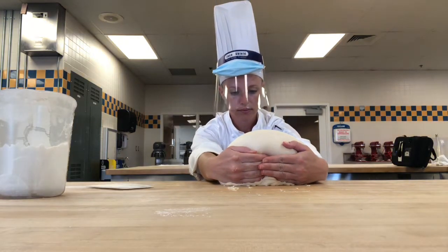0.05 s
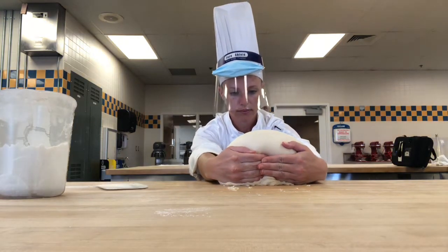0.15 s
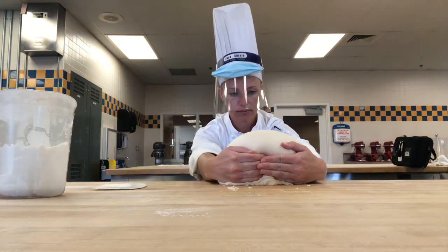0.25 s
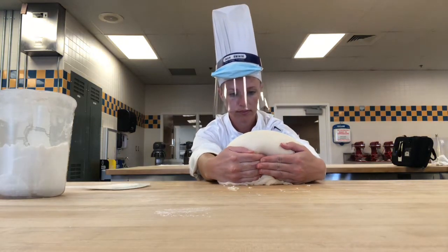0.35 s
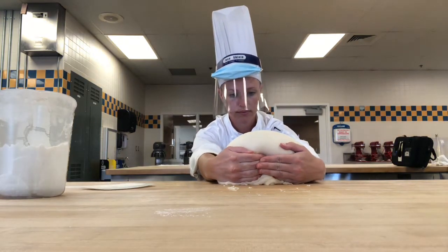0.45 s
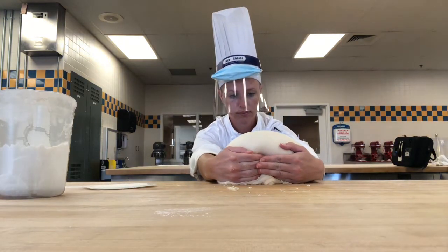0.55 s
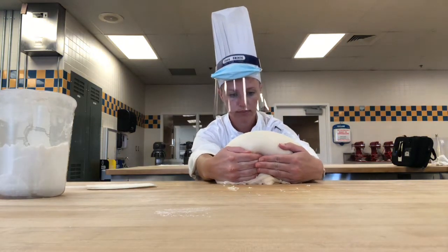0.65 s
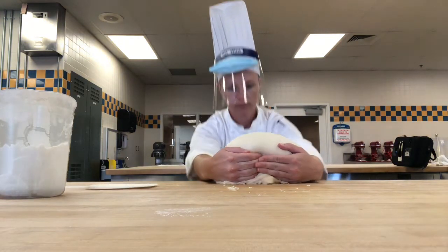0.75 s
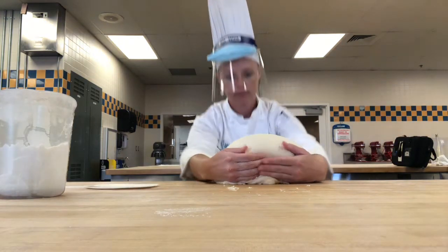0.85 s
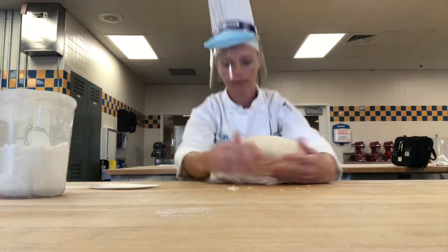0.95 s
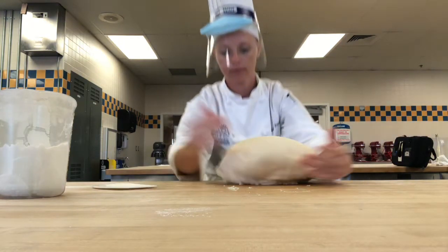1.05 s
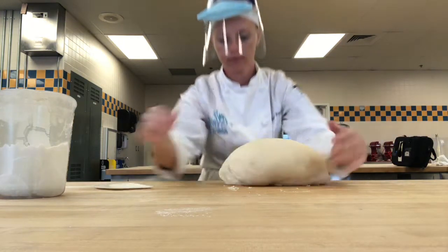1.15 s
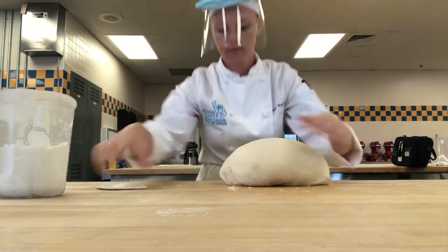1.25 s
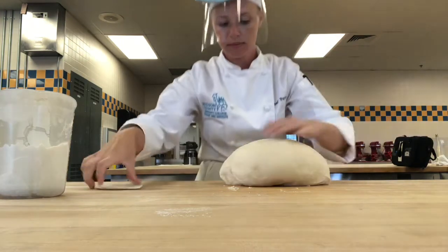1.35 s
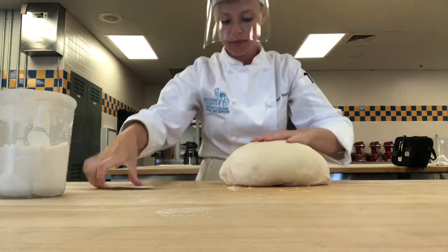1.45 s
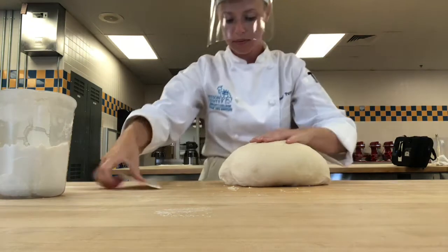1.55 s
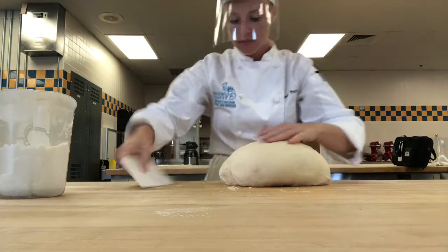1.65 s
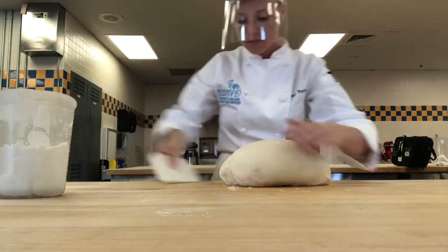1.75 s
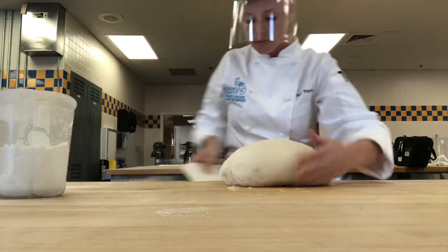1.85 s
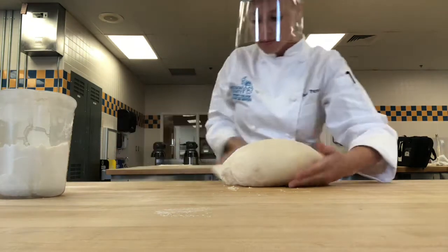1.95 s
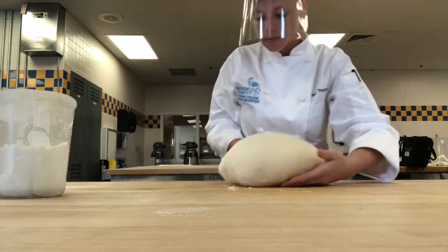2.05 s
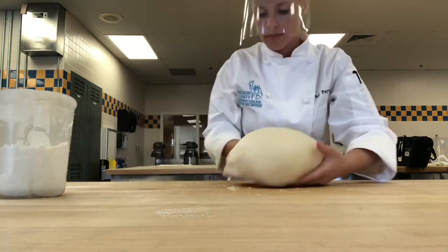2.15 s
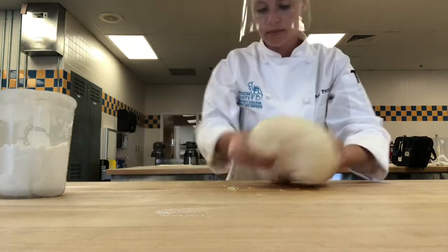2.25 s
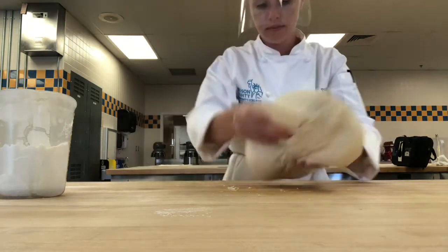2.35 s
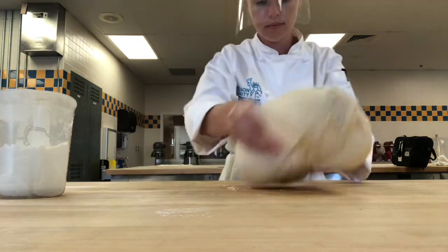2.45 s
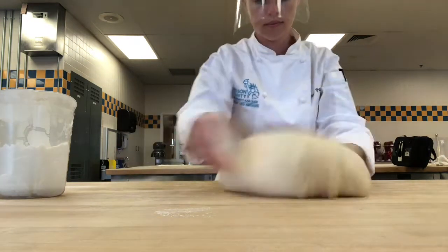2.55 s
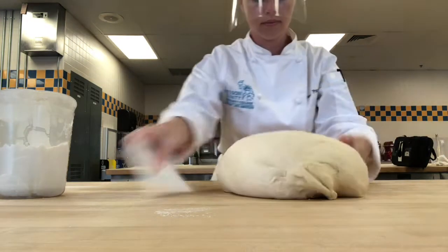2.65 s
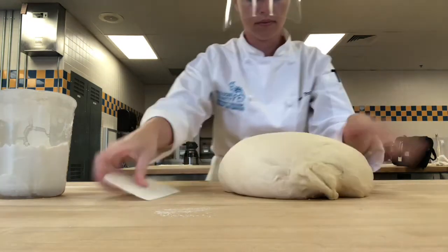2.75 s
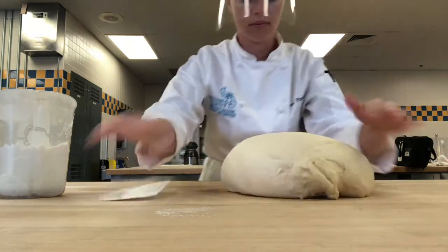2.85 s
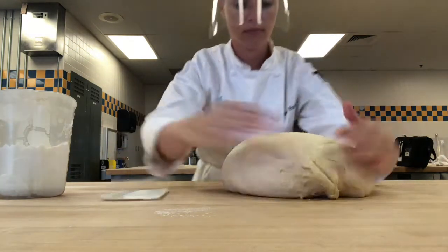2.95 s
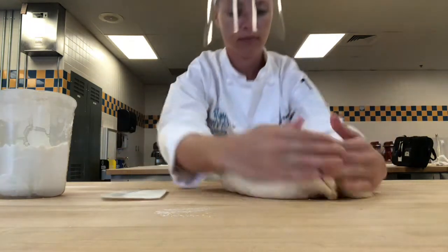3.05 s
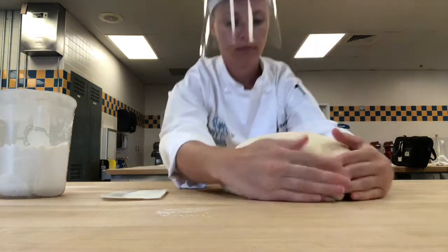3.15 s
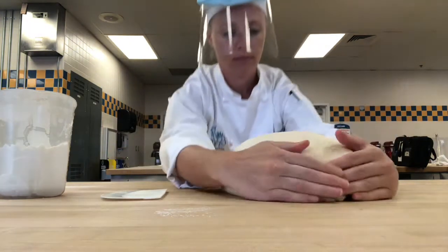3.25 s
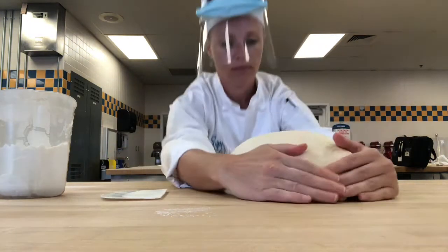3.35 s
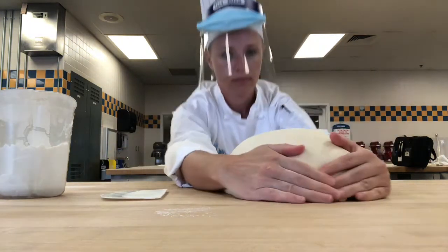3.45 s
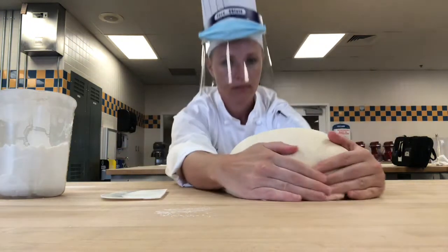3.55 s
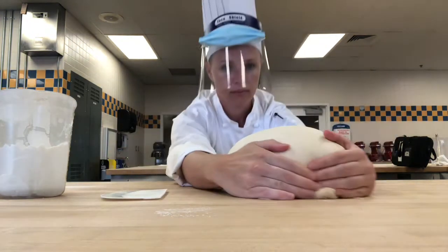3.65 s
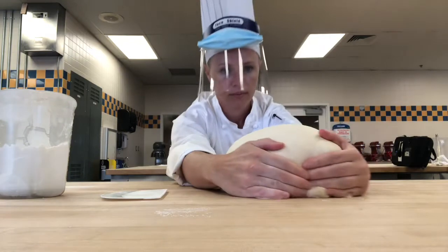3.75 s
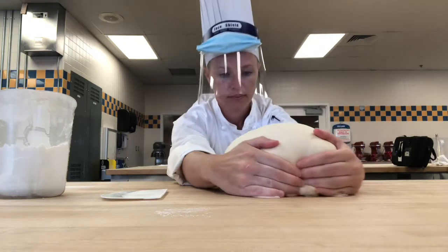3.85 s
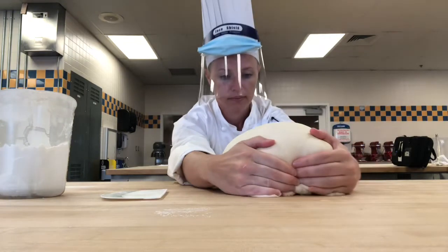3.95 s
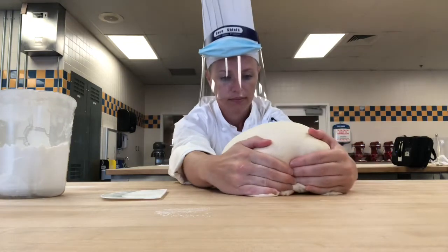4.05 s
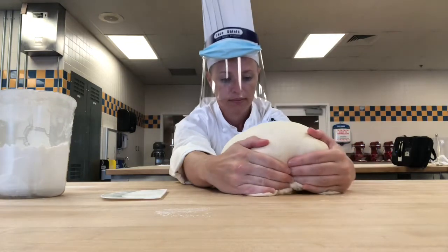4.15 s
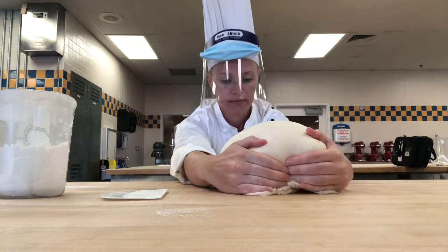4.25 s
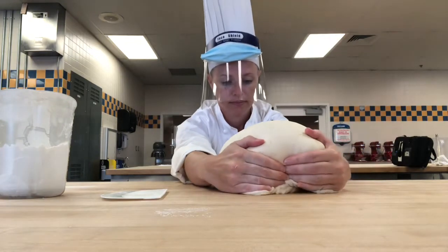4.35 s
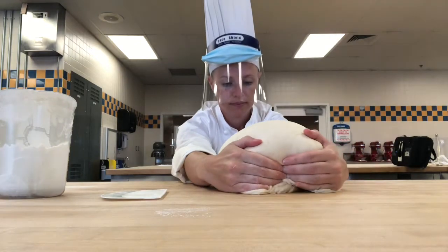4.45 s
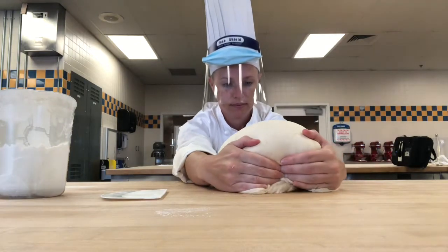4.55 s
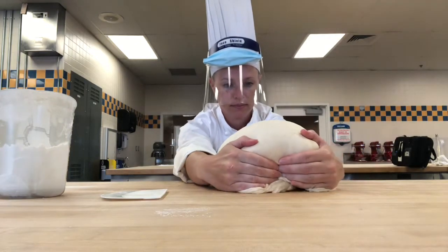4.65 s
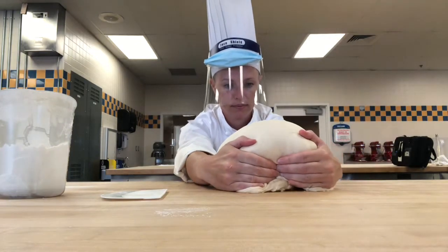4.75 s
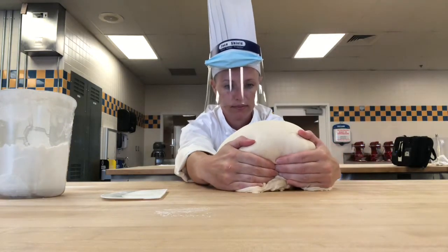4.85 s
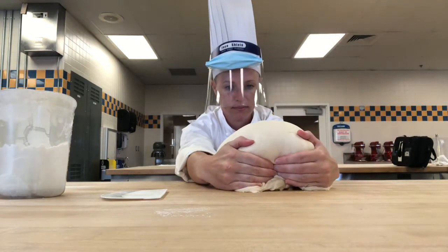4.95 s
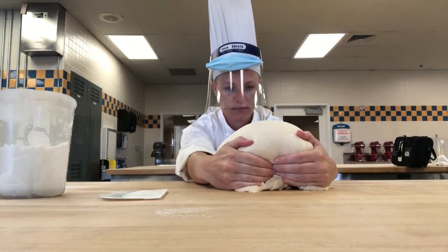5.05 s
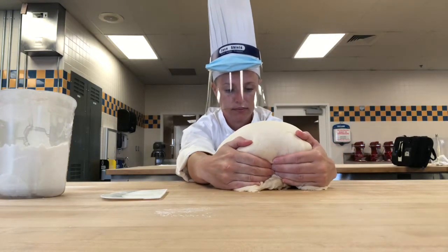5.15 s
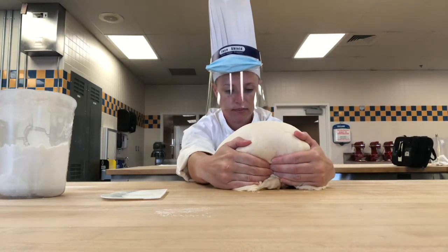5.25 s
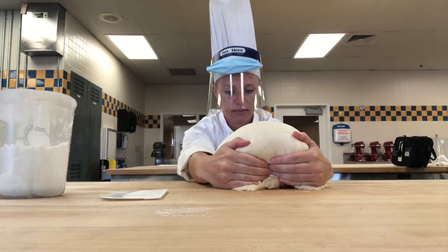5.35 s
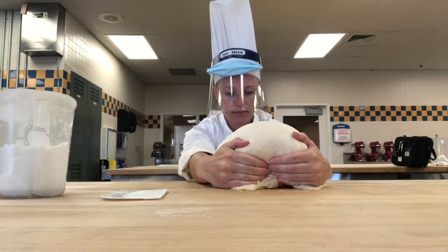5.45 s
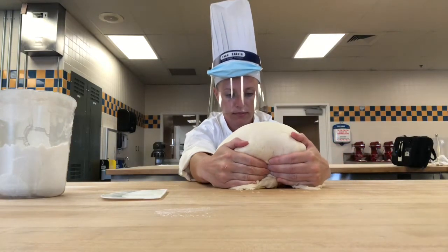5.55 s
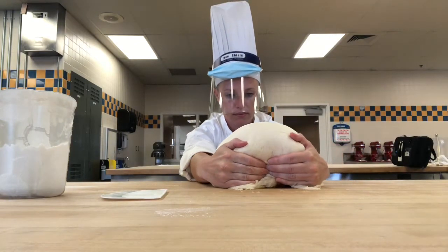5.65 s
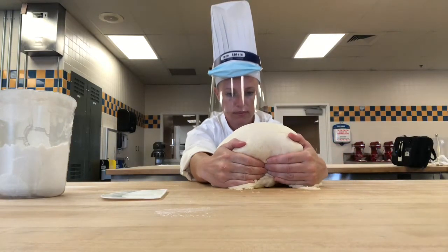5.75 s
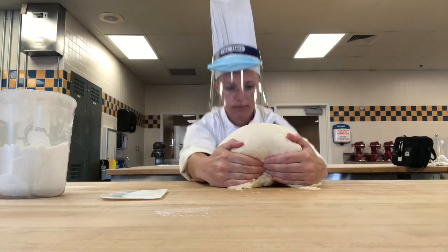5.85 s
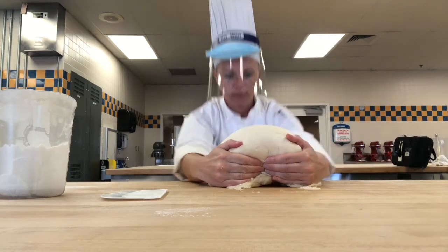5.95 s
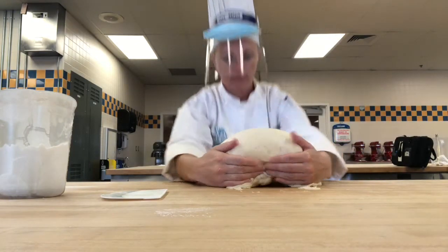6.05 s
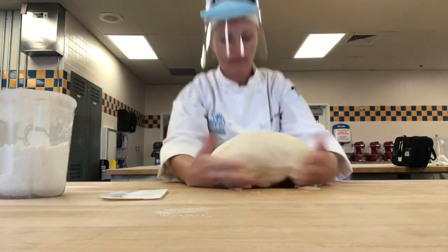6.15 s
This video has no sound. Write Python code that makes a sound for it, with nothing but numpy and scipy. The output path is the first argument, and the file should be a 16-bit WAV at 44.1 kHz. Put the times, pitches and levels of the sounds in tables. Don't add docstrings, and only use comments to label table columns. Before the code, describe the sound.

Steady low, slightly beating hum and a dull ventilation rush fill a big reverberant kitchen throughout. Near the microphone, dry skin and flour slip over a wooden bench, with crumb ticks. A thin plastic scraper clatters, bites the wood in a quick rough scrape, and then dough slaps sharply and the scraper clacks down. Hands settle into quiet, soft dragging, a brief thin air whistle, and a final stronger rub with a light slap.

```python
import sys
import numpy as np
from scipy import signal
from scipy.fft import rfft, irfft
from scipy.io import wavfile

SR = 44100
rng = np.random.default_rng(int(sys.argv[2]) if len(sys.argv) > 2 else 0)


def transcribe(u):
    v = np.clip(np.atleast_2d(u).T, -1, 1)
    q = np.round(v * 32767).astype(np.int16)
    wavfile.write(sys.argv[1], SR, q)


def voltage_ratio(decibels):
    exponent = np.asarray(decibels, float) / 20
    return 10 ** exponent


N = 272538

# peak_s, rise_s, fall_s, skin_db, flour_over_skin_db
SCRAPER_STROKES = [(1.34, .01, .012, -68, -18), (1.426, 0.04, 0.028, -54, -1.5), (1.59, 0.24, .1, -63, -6),
                   (1.7, .08, 0.052, -64, -15), (1.77, 0.037, 0.081, -52, -4.5),
                   (1.83, .025, 0.057, -48, -10), (1.885, 0.053, 0.028, -44, -12),
                   (1.911, 0.02, 0.012, -43, -17), (1.94, .03, 0.046, -50.5, -13),
                   (2.07, 0.24, 0.1, -55, -10), (2.17, .06, 0.065, -57.5, -19),
                   (2.215, 0.043, 0.052, -67.5, 1), (2.255, 0.04, 0.015, -64, -1),
                   (2.37, .1, .07, -73, -20), (2.445, 0.025, 0.027, -63, 0), (2.51, 0.039, 0.039, -58, -3),
                   (2.67, 0.061, 0.093, -56, -12), (2.776, 0.0092, 0.034, -54, -30)]


def rms_one(x):
    return x / np.sqrt(np.mean(x ** 2) + 1e-20)


def in_time(rows):
    s, *columns = np.transpose(rows)
    return [np.interp(np.arange(N) / SR, s, column) for column in columns]


def drift(rate_hz):
    r = np.exp(-80 * np.pi * rate_hz / SR)
    slow = signal.lfilter([1], [1, -2 * r, r * r], rng.standard_normal(N // 40 + 2002))
    slow = rms_one(slow[2000:])
    return np.interp(np.arange(N) / 40, np.arange(len(slow)), slow)


def coloured(white, spectrum):
    hz, db = np.transpose(spectrum)
    axis = np.log(np.fft.rfftfreq(N, 1 / SR) + 1)
    gain = voltage_ratio(np.interp(axis, np.log(hz), db, left=-60, right=-60))
    return rms_one(irfft(rfft(white) * gain, N))


def resonate(x, hz, width_hz):
    r = np.exp(-np.pi * width_hz / SR)
    poles = [1, -2 * r * np.cos(2 * np.pi * hz / SR), r * r]
    return signal.lfilter([(1 - r * r) / 2, 0, (r * r - 1) / 2], poles, x)


def add(out, s, piece):
    at = round(s * SR)
    out[at:at + len(piece)] += piece[:N - at]


def hum():
    # [(multiple, level_db rms)]
    machines = [
        (28.725, .295, [(1, -66), (4, -46), (6, -57), (10, -62), (11, -56), (12, -69), (13, -61), (16, -59), (17, -64), (18, -62), (19, -60), (22, -67)]),
        (57.89, .23, [(1, -54), (2, -54), (3, -62), (4, -54), (5, -62), (6, -66), (8, -63), (9, -65), (10, -68)]),
        (28.23, .27, [(2, -60), (7, -63), (8, -67)]),
        (112.92, .72, [(1, -59)]),
        (229.8, .05, [(1, -47)]),
        (120.01, .03, [(1, -52)]),
        (240.02, .76, [(1, -61)]),
        (125.81, .86, [(1, -53)]),
        (126.66, .45, [(1, -53)]),
        (135.84, .14, [(1, -63)]),
    ]
    t, out = np.arange(N) / SR, np.zeros(N)
    for turns_per_s, start_turns, orders in machines:
        angle = 2 * np.pi * (turns_per_s * t + start_turns)
        for multiple, db in orders:
            out += np.sqrt(2) * voltage_ratio(db) * np.cos(multiple * angle)
    return out


def ventilation():
    # pitch_hz, level_db per Hz
    air = [(38, -40), (55, 1), (82, -7.5), (125, -2), (480, -3.5), (620, -9), (820, -7.5), (1400, -11),
           (1900, -22), (2600, -25.5), (3200, -32), (7500, -38.5), (9000, -45.5), (16000, -53)]
    # pitch_hz, width_hz, level_db
    duct = [(342, 15, -28.5), (423, 19, -13), (466.4, 23, -9), (513.4, 17.5, -11.5)]
    notes = sum(voltage_ratio(db) * rms_one(resonate(rng.standard_normal(N), hz, width_hz))
                for hz, width_hz, db in duct)
    breathing_db = -44.5 + 0.55 * drift(2.5)
    return voltage_ratio(breathing_db) * (coloured(rng.standard_normal(N), air) + notes)


def kitchen(x):
    t60_s, tail_db = 0.99, -21
    echo_s, echo_db, echo_low_cut_hz = 0.0085, -21, 1900
    t = np.arange(SR // 2) / SR
    dull = signal.lfilter([1], [1, -.6], rng.standard_normal(len(t)))
    tail = dull * voltage_ratio(-60 * t / t60_s) * (1 - np.exp(-(t / 0.016) ** 2))
    tail /= np.sqrt(np.sum(tail ** 2))
    high_pass = signal.butter(2, echo_low_cut_hz, "high", fs=SR, output="sos")
    echo = signal.sosfilt(high_pass, np.roll(x, round(echo_s * SR)))
    scatter = rng.standard_normal(300) * np.exp(-np.arange(300) / 90)
    scatter /= np.sqrt(np.sum(scatter ** 2))
    echo = signal.fftconvolve(echo, scatter)[:N]
    return voltage_ratio(tail_db) * signal.fftconvolve(x, tail)[:N] + voltage_ratio(echo_db) * echo


def leaks():
    # start_s, length_s, level_db
    puffs = [
        (4.328, 0.038, -61),
        (5.163, 0.03, -59.5),
    ]
    # time_s, pitch_hz, level_db
    whistle = [
        (5.07, 4170, -66),
        (5.112, 4380, -57),
        (5.126, 4460, -62),
        (5.132, 4360, -64),
        (5.158, 4490, -58),
        (5.18, 4740, -64),
        (5.185, 4950, -80),
        (5.192, 5050, -75),
        (5.21, 4950, -76),
    ]
    gate, t = np.zeros(N), np.arange(N) / SR
    for s, length_s, db in puffs:
        gate += voltage_ratio(db) * np.clip(np.minimum(t - s, s + length_s - t) / .004, 0, 1)
    hiss_spectrum = [(3000, -20), (4700, -3), (7000, 3), (9000, 2), (11500, 4), (15000, -2), (16500, -8)]
    hiss = gate * coloured(rng.standard_normal(N), hiss_spectrum)
    hz, whistle_db = in_time(whistle)
    sounding = np.clip(np.minimum(t - whistle[0][0], whistle[-1][0] - t) / .012, 0, 1)
    level = np.sqrt(2) * voltage_ratio(whistle_db - 1.5 + 2.0 * drift(60.0)) * sounding
    phase = 2 * np.pi * np.cumsum(hz + 25 * drift(90.0)) / SR
    return hiss + level * np.sin(phase)


def thuds():
    # start_s, level_db, pitch_hz, decay_ms
    pushes = [(1.2911, -12, 340, 2.6), (2.642, -21, 830, 2.5), (2.6415, -19, 480, 3), (2.433, -27, 500, 3),
              (1.328, -30, 900, 2.5), (1.2955, -18, 290, 3.5), (1.731, -26, 400, 3), (2.4365, -30, 700, 3),
              (2.606, -26, 1200, 3.7), (6.139, -32, 710, 3), (2.27, -39, 247.3, 13), (2.472, -16.5, 270, 3),
              (2.481, -27, 110, 15), (2.93, -46, 100, 10), (3.119, -29, 120, 10), (6.14, -31, 190, 9.2)]
    out, t = np.zeros(N), np.arange(4000) / SR
    for s, db, hz, decay_ms in pushes:
        swell = (1 - np.exp(-t / .0025)) * np.exp(-t / (0.00067 * max(decay_ms, 2)))
        add(out, s, voltage_ratio(db) * np.sin(2 * np.pi * hz * t) * swell)
    return out


def ticks():
    # start_s, peak_db, centre_hz, width_octaves
    crumb_ticks = [(0.8058, -54, 8500, 1.2), (0.852, -58, 5000, 1), (.884, -59, 5000, .7),
                   (.909, -57, 7000, 1.2), (.9204, -53, 5000, .7), (0.9434, -44, 6500, .8),
                   (.9684, -50, 5000, 1.2), (.9893, -49, 6000, 2.5), (.9935, -55, 10000, 1),
                   (1.0377, -54, 6940, 2), (1.0454, -60, 9000, 1.5), (1.2093, -46, 2500, 1.6),
                   (1.3275, -47, 3500, 2), (1.337, -54, 4500, 1), (2.4285, -47, 8000, 2),
                   (2.637, -33, 2000, 0.93), (2.6406, -25.5, 9000, 1.9), (2.7749, -47, 5940, 2.2),
                   (2.778, -52, 9900, 1.2), (2.799, -60, 11000, .4), (2.856, -52, 7000, .5),
                   (2.8685, -35, 4000, 0.96), (2.932, -57, 9000, 1.1), (2.9475, -39, 6950, 1),
                   (2.9495, -43, 6000, 1.2), (2.9824, -44, 7500, 1.3), (3.006, -55, 11500, .4),
                   (3.102, -61, 6500, .5), (3.1124, -40, 7000, 1.9), (4.3312, -56, 9000, 1.5),
                   (4.943, -53, 8000, 1), (5.886, -55, 5500, .8), (6.006, -52, 5500, 1.2),
                   (6.0368, -40, 5500, 1.3), (6.0434, -45, 7000, 1.5), (6.072, -52, 5500, 1),
                   (6.085, -48, 5500, 2), (6.105, -52, 6000, 1), (6.119, -52, 4500, 1.2),
                   (6.159, -50, 5000, 2)]
    # start_s, peak_db, centre_hz, width_octaves
    snags = [(1.7515, -46, 4500, 1.5), (1.758, -42, 2600, 1), (1.766, -42, 4500, 1.5),
             (1.774, -43, 5000, 1), (1.786, -44, 2500, 1.5), (1.829, -44, 4000, 1.8),
             (1.836, -38, 3500, 1.5), (1.845, -39, 4500, 1.8), (1.861, -40, 3000, 2),
             (1.871, -39, 4500, 1.3), (1.883, -36, 3500, 2), (1.89, -40, 4000, 2), (1.897, -39, 3500, 2),
             (1.905, -37, 3000, 2), (1.914, -39, 3000, 2), (1.924, -47, 3000, 1.5)]
    decay_ms = 0.99
    out, t = np.zeros(N), np.arange(300) / SR
    for s, db, hz, octaves in [*crumb_ticks, *snags]:
        band_hz = np.clip(hz * 2 ** (np.array([-.5, .5]) * max(octaves, .2)), 500, 16000)
        burst = (4 * (t == 0) + rng.standard_normal(len(t))) * np.exp(-t / (0.0013 * decay_ms))
        tick = signal.sosfilt(signal.butter(2, band_hz, "band", fs=SR, output="sos"), burst)
        add(out, s, voltage_ratio(db) * tick / np.abs(tick).max())
    return out


def contacts():
    # start_s, crack_db, body_db, body_hz, contact_ms
    knocks = [(1.683, -60, -40, 950, 7.3), (1.696, -60, -34, 895, 3.7), (1.7279, -29, -24.5, 1300, 4.4),
              (1.742, -36, -30, 1160, 2.9), (1.7908, -46, -28.5, 1250, 1.6), (2.429, -50, -42, 1060, 2.8),
              (2.4337, -51, -40, 1600, 1.8), (2.436, -47, -33, 1080, 1.6), (2.6055, -29, -24.5, 1450, 1.9),
              (2.6402, -19, -13, 1327, 3.9), (1.328, -43, -36, 2030, 1.4), (1.737, -53, -34, 1290, 3.8),
              (2.699, -55, -33, 1360, 2.2), (2.716, -55, -39, 1460, 4.5), (2.775, -49, -40, 1360, 2.6),
              (6.129, -42, -44, 1340, 3.7), (6.139, -46, -40, 1510, 3.9)]
    # start_s, crack_db, bright_db, body_db
    slaps = [
        (1.2085, -48, -28, -44),
        (2.4337, -35.5, -8, -36),
        (2.4709, -42, -29, -32),
        (2.4748, -46, -25, -27),
        (2.4805, -29, -4, -25.5),
        (2.483, -36, -12, -38),
        (2.4853, -39, -20, -39),
        (2.6714, -44, -20, -34),
        (6.138, -44, -14, -40),
    ]
    slap_hz, slap_ms = 2240, 0.68
    palm_lag_s, palm_hz, palm_db = 0.000994, 840, -2.5
    hits = []
    for s, db, body_db, hz, ms in knocks:
        hits.append((s, db, -31 + 2 * ms, hz, body_db, ms))
    for s, db, bright_db, body_db in slaps:
        hits.append((s, db, bright_db, slap_hz, body_db, slap_ms))
        hits.append((s + palm_lag_s, db - 5, bright_db, palm_hz, body_db + palm_db, 2 * slap_ms))
    return hits


def taps():
    # pitch_hz, width_hz, level_db
    scraper_modes = [(2330, 350, 3), (3540, 140, 8), (4120, 180, 7.5), (5020, 220, 5), (5630, 300, -1),
                     (6830, 250, 1), (7350, 250, -7), (8750, 490, 0), (9500, 400, -5)]
    face_lag_s = .0004
    out, t = np.zeros(N), np.arange(600) / SR
    mid = signal.butter(2, [1800, 8000], "band", fs=SR, output="sos")
    top = signal.butter(2, [6500, 13500], "band", fs=SR, output="sos")
    for s, crack_db, bright_db, hz, body_db, contact_ms in contacts():
        low, high, rough = rng.standard_normal((3, len(t)))
        contact = t / (0.00092 * max(contact_ms, 1))
        fade = .85 * np.exp(-contact / .22) + .15 * np.exp(-contact / .8)
        fade = np.minimum(t / .0002, 1) * fade
        blow = 1.5 * low * fade + 2.0 * (t == 0)
        modes = sum(voltage_ratio(db) * resonate(blow, mode_hz, width_hz) * (-1) ** k
                    for k, (mode_hz, width_hz, db) in enumerate(scraper_modes))
        dull = signal.sosfilt(mid, low * fade + 1.8 * modes)
        sharp = signal.sosfilt(top, high * fade ** 1.5)
        crack = dull / np.abs(dull).max() + voltage_ratio(bright_db + 6.5) * sharp / np.abs(sharp).max()
        swell = np.tanh((contact / 0.24) ** 2) * np.exp(-(contact / 1.02) ** 5.3)
        ring = np.sin(2 * np.pi * hz * t * (1.06 - 0.045 * contact))
        ring = ring + .6 * resonate(resonate(rough, hz, 900.0), hz, 900.0)
        push = 0.41 * contact * np.sin(2 * np.pi * 520 * t)
        add(out, s + .0001, voltage_ratio(crack_db) * crack)
        add(out, s + face_lag_s, voltage_ratio(body_db) * swell * (ring + push))
    return out


def stroke(s, rise_s, fall_s):
    ends_db, sharpness = 9.5, 1.37
    late = np.arange(0, N + 32, 32) / SR - s
    speed = voltage_ratio(-ends_db * np.abs(late / np.where(late < 0, rise_s, fall_s)) ** sharpness)
    return np.interp(np.arange(N) / 32, np.arange(len(speed)), speed)


def stroke_power(s, rise_s, fall_s, db):
    return (voltage_ratio(db) * stroke(s, rise_s, fall_s)) ** 2


def grit(per_s, spread_db):
    sizes = voltage_ratio(spread_db * np.minimum(rng.exponential(1, N), 4)) * rng.standard_normal(N)
    slips = sizes * (rng.random(N) < per_s / SR)
    return rng.standard_normal(N) + 0.65 * rms_one(slips)


def biting_edge(flutter_db):
    # peak_s, rise_s, fall_s, level_db
    bites = [(1.08, 0.027, 0.058, -55), (1.212, 0.02, 0.0074, -51), (1.5, 0.26, 0.31, -58),
             (1.7, 0.037, 0.068, -50.5), (1.76, 0.026, 0.034, -46), (1.802, .02, 0.021, -59),
             (1.838, 0.011, 0.032, -48), (1.905, 0.021, 0.025, -45), (1.95, 0.033, 0.19, -53.5),
             (2.45, 0.055, .12, -57), (2.655, 0.019, .03, -45), (2.72, .06, 0.15, -54),
             (2.87, .02, 0.092, -54), (3.45, 0.44, 0.043, -59), (3.525, .01, .1, -58),
             (5.815, 0.065, 0.013, -63), (6.05, .2, .08, -60), (6.138, 0.023, 0.034, -52)]
    # pitch_hz, level_db per Hz
    edge = [(550, -32), (800, -10), (1050, -1), (1450, 8), (2300, -2.5), (2700, -14), (3300, -14)]
    idle_db = -60.5
    power = voltage_ratio(2 * idle_db) + sum(stroke_power(*bite) for bite in bites)
    grating = coloured(grit(1200.0, spread_db=2.5), edge)
    return np.sqrt(power) * voltage_ratio(flutter_db + 1.3 * drift(36.0)) * grating


def singing_blade(slips):
    power = sum(stroke_power(s, rise_s, fall_s, db)
                for s, rise_s, fall_s, db, _ in SCRAPER_STROKES if s < 2)
    band = rms_one(resonate(slips, hz=4550, width_hz=700))
    return np.sqrt(power) * voltage_ratio(-14.0 + 2.3 * drift(25.0)) * band


def crumbs(skin_power):
    per_s, level_db = 130, -19.0
    snaps = rng.standard_normal(N) * (rng.random(N) < per_s / SR)
    snaps = resonate(resonate(snaps, 4500, 5000.0), 4500, 5000.0)
    return np.sqrt(skin_power) * voltage_ratio(level_db) * rms_one(snaps)


def glints(slips):
    # peak_s, half_length_s, level_db, pitch_hz, width_hz
    lit = [(.87, .03, -69, 4900, 1500), (0.955, .008, -56, 4200, 1300), (1.12, 0.014, -76, 3500, 1200),
           (1.427, 0.0086, -56, 6800, 1500), (1.435, .03, -65, 4500, 450), (1.765, 0.011, -60, 2590, 500),
           (1.77, 0.0074, -59, 1700, 500), (1.808, 0.0074, -50, 1300, 500), (1.843, 0.017, -63, 6460, 1200),
           (1.83, 0.0089, -55, 3420, 600), (1.882, 0.016, -57, 4680, 500), (1.886, 0.0095, -45, 1590, 400),
           (1.913, 0.014, -49, 2750, 596), (1.303, 0.0056, -44, 1380, 400), (2.708, 0.039, -58, 1410, 600),
           (6.132, 0.011, -46, 700, 400), (2.614, 0.0049, -49, 4200, 800), (2.676, 0.0055, -47, 2500, 400),
           (2.78, .008, -59, 3160, 900), (5.94, .02, -67, 4300, 700), (6.085, .008, -63, 4800, 600),
           (6.128, .006, -58, 2500, 700), (6.141, .004, -48, 2680, 500), (6.146, 0.0039, -47, 800, 300),
           (6.163, .008, -64, 3200, 700)]
    out = np.zeros(N)
    for s, half_s, db, hz, width_hz in lit:
        band = rms_one(resonate(resonate(slips, hz, width_hz), hz, 2 * width_hz))
        out += voltage_ratio(db) * stroke(s, half_s, half_s) * band
    return out


def rubbing():
    # time_s, skin_db, flour_db
    press = [
        (0, -75, -98),
        (.7, -67, -83),
        (2.3, -65, -85),
        (4.1, -69, -73.5),
        (4.7, -68, -78),
        (5.1, -68.5, -77.5),
        (5.5, -65, -78.5),
        (6.18, -76, -76),
    ]
    # peak_s, rise_s, fall_s, skin_db, flour_over_skin_db
    hand_strokes = [(.806, 0.011, .014, -67, -1), (.87, 0.044, .08, -63, -1), (.91, .04, .03, -60, -14),
                    (.955, 0.028, 0.02, -55.5, -9), (.992, .008, .012, -60, -5),
                    (1.042, .015, 0.014, -68, -6), (1.11, 0.24, 0.1, -58.5, -10),
                    (1.23, 0.035, .09, -64, -24), (2.87, 0.036, 0.088, -57, -26),
                    (2.95, 0.043, 0.066, -54.5, -13), (3.08, 0.15, 0.055, -63, -11),
                    (3.34, 0.3, 0.17, -59.5, -19), (3.56, 0.43, 0.23, -62.5, 0),
                    (3.75, 0.12, 0.17, -63, -4), (4.36, 0.047, 0.12, -64.5, -8), (5.68, .04, .14, -79, 0),
                    (5.92, .12, 0.11, -60.5, -9.5), (6.08, 0.13, 0.06, -55, -8.5),
                    (6.135, 0.069, .1, -54.5, -6), (6.165, 0.031, .04, -65, 6)]
    # pitch_hz, level_db per Hz
    skin_spectrum = [(1500, -16), (2200, 4), (3200, 0), (4600, 1), (6700, -11.5), (9000, -34), (14000, -44)]
    # pitch_hz, level_db per Hz
    flour_spectrum = [(4000, -12), (7000, -6), (9000, -7.5), (13000, -12), (16000, -12)]
    # pitch_hz, width_hz, level_db
    hollows = [(1560, 150, 2.5), (2340, 380, 9), (3560, 450, 3), (4500, 400, -24), (5720, 530, -1),
               (7100, 1900, -4)]
    skin_power, flour_power = voltage_ratio(2 * np.array(in_time(press)))
    for s, rise_s, fall_s, db, flour_db in [*hand_strokes, *SCRAPER_STROKES]:
        power = stroke_power(s, rise_s, fall_s, db)
        skin_power = skin_power + power
        flour_power = flour_power + power * voltage_ratio(2 * flour_db)
    flutter_db = 1.2 * drift(60.0)
    slips = grit(2200.0, spread_db=2.3)
    hollow = sum(voltage_ratio(db + 4.0 * drift(15.0)) * rms_one(resonate(slips, hz, width_hz))
                 for hz, width_hz, db in hollows)
    skin = coloured(slips, skin_spectrum) + 0.4 * rms_one(hollow)
    skin = np.sqrt(skin_power) * voltage_ratio(-3.5 + flutter_db) * skin
    flour_gain = np.sqrt(flour_power) * voltage_ratio(1.34 + flutter_db + 0.95 * drift(30.0))
    flour = flour_gain * coloured(slips, flour_spectrum)
    scraper = biting_edge(flutter_db) + singing_blade(slips)
    return skin + flour + scraper + crumbs(skin_power) + glints(slips)


def scene():
    hits = taps() + ticks() + thuds()
    background = hum() + ventilation()
    return (background + rubbing() + leaks() + hits + kitchen(hits))[None]


def low_pass(x):
    return signal.sosfilt(signal.butter(12, 15840, fs=SR, output="sos"), x)


def record(dry):
    top_cut = signal.cheby2(10, 30, 16050, fs=SR, output="sos")
    mix = signal.sosfilt(top_cut, dry)
    return low_pass(mix)


dry = scene()
out = record(dry)
transcribe(out)
```